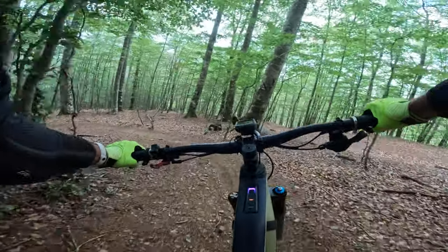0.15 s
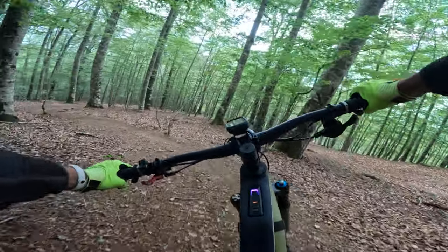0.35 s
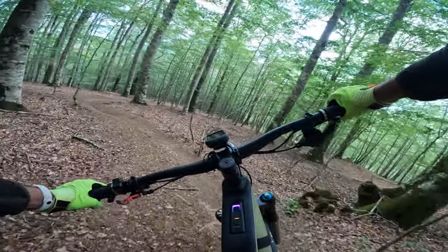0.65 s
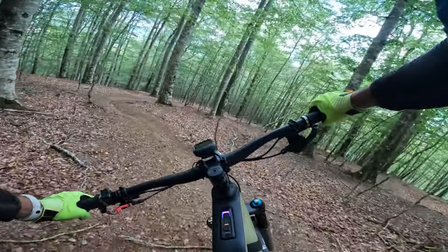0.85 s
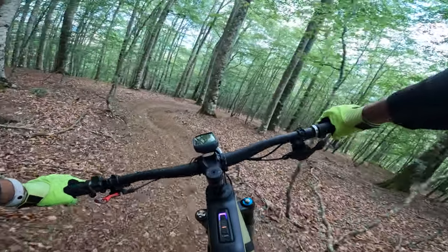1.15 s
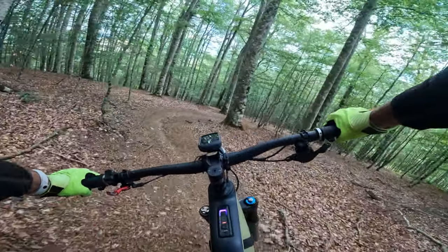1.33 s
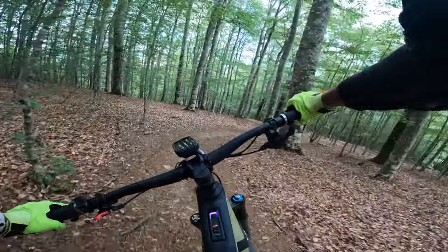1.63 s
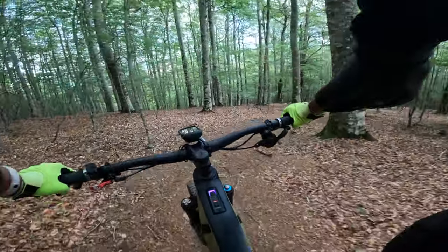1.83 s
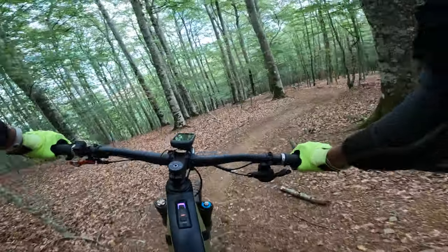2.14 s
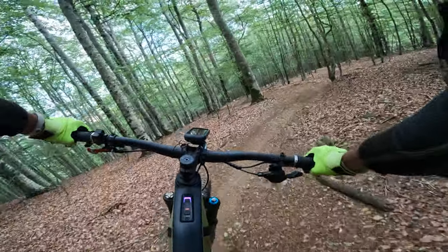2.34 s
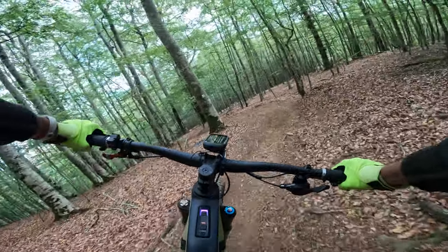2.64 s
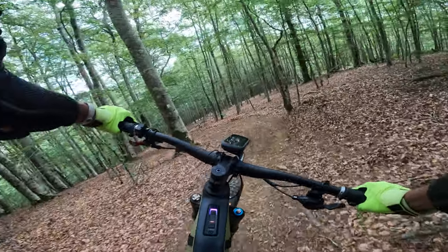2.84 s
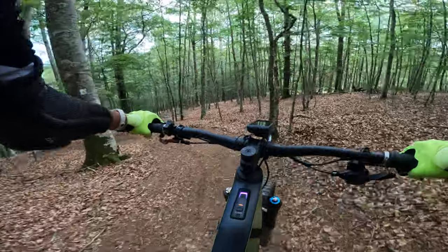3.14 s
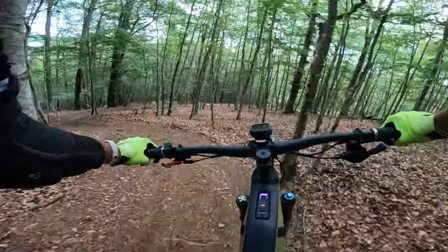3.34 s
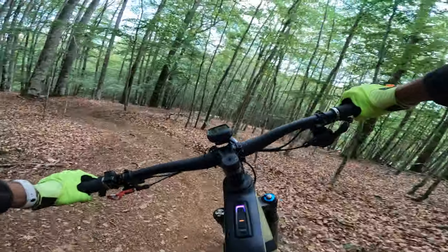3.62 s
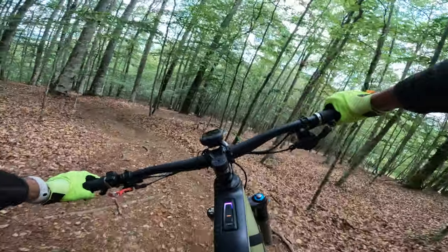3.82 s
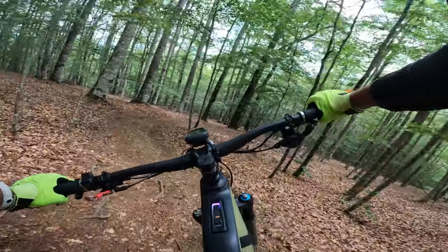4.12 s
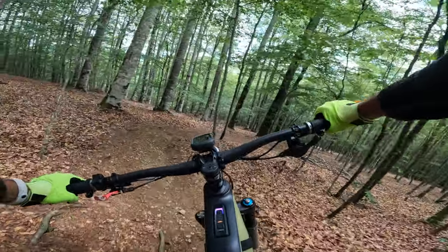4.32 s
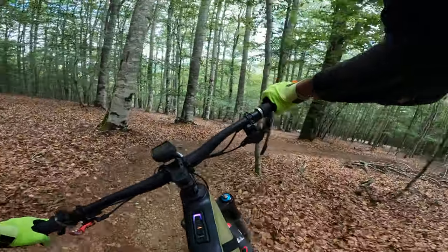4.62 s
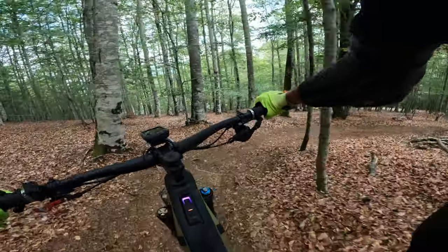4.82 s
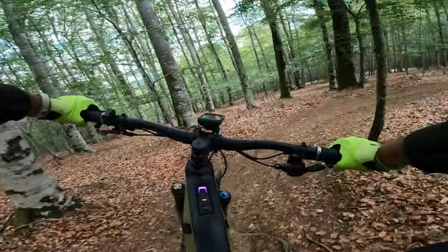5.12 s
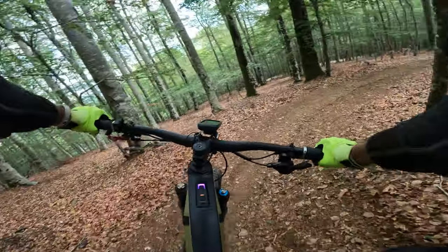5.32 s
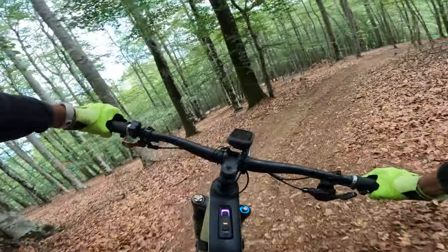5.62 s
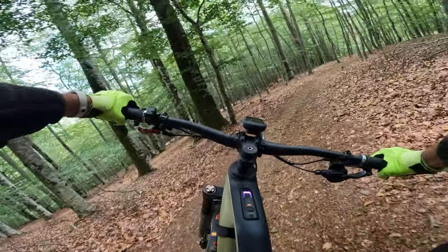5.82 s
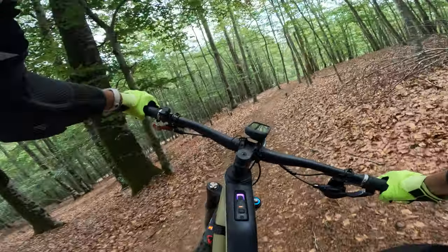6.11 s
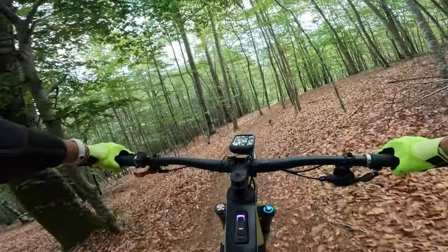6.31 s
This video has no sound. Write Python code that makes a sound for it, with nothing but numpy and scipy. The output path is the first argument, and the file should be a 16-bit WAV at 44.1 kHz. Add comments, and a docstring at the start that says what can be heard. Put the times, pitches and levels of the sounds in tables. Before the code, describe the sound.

A mountain bike descends a forest trail, heard close at the rider's chest with no noticeable echo. Gritty tyre scrub, dull drumming and dry leaf crackle run throughout beneath lumpy, low wind. From 0 to 0.8 s it is busy: twigs snap, the chain slaps brightly and heavy thuds cluster around 0.5-0.7. A knock lands at 1.0, then rolling smooths, with a thin ticking freewheel hiss. Jolts hit at 2.1-2.5 with tiny squeaks, and wind buffets strongly until 2.8. After a quieter stretch, a gust and deep bump arrive at 3.3-3.5, thuds at 3.6, then rapid hollow knocks and a rough skid around 3.95-4.15, the hardest knock at 4.06. It calms, the freewheel swelling near 4.7. Rattling slaps and short scrapes come at 5.07-5.2, more slaps at 5.4, strong thuds at 5.7, a knock at 6.07, and a final wind buffet at 6.4.

```python
"""Forest trail of dry leaves: a mountain bike rolls downhill, heard at the rider's chest.
Wind is shaped noise in gusts and buffets; leaves and twigs are gritty noise and short cracks.
The freewheel hisses with ratchet ticks; squeaks are rough sine sweeps.
Clicks and noise through resonances make the drumming frame, rattling parts and skids;
knocks, chain slaps and tyre thuds are short decaying tones with chatter."""
import sys
import numpy as np
from scipy import signal
from scipy.fft import rfft, irfft, next_fast_len
from scipy.io import wavfile
from scipy.ndimage import uniform_filter1d, minimum_filter1d

SR = 44100
rng = np.random.default_rng(int(sys.argv[2]) if len(sys.argv) > 2 else 0)


def put_to_file(sound):
    """Save the sound as 16-bit audio at rate SR, in the file named by the first command-line argument."""
    columns = np.atleast_2d(sound).T  # one column per channel
    safe = np.clip(columns, -1, 1)
    whole_steps = np.round(safe * 32767)
    wavfile.write(sys.argv[1], SR, whole_steps.astype(np.int16))


N = 284865

# steady rolling: t/s, drumming of tyres and frame/dB, tread scrub/dB
ROLLING = [(0.0, -25, -43), (0.52, -29, -36.5), (0.7, -28, -45), (1.01, -33.5, -38.5), (2.43, -29.5, -38),
           (2.9, -33.5, -43.5), (3.27, -32, -42), (3.51, -24.5, -34), (3.99, -30, -37.5),
           (4.44, -33.5, -42), (4.77, -33, -36.5), (5.07, -32, -37.5), (6.06, -35.5, -39.5),
           (6.46, -29.5, -56)]


def amp(db):
    """Decibels to gain."""
    return 10 ** (np.asarray(db) / 20)


def unit(x):
    """Scales to rms 1."""
    return x / np.sqrt(np.mean(x ** 2) + 1e-20)


def follow(table):
    """Each level column of a curve table as a gain per sample."""
    t, *columns = np.transpose(table)
    return [amp(np.interp(np.arange(N) / SR, t, db)) for db in columns]


def swells(table, rise_share):
    """Each level column of an event table as a gain per sample: swells that climb and fall away."""
    fall_db = 10  # climb and fall are timed over this change of level
    min_fall_s, min_rise_s = 0.01, 0.013
    t, power = np.arange(N) / SR, 0
    for peak_s, length_s, *db in table:
        fall = (t - peak_s) / max(length_s, min_fall_s)
        climb = (peak_s - t) / (min_rise_s + abs(rise_share * length_s))
        power = power + amp(2 * np.c_[db]) * amp(-2 * fall_db * np.maximum(fall, climb))
    return np.sqrt(power)


def colour(x, points):
    """Filters by a spectrum of (f/Hz, gain/dB), -90 dB outside its range."""
    f, db = np.transpose(points)
    size = next_fast_len(len(x) + 8192)
    hz = np.fft.rfftfreq(size, 1 / SR) + 1
    gain = amp(np.interp(np.log(hz), np.log(f), db, -90, -90))
    return irfft(rfft(x, size) * gain, size)[:len(x)]


def ring(x, hz, width_hz):
    """A two-pole resonance of gain about 1 at its centre."""
    r = np.exp(-np.pi * width_hz / SR)
    return 2 * signal.lfilter([1 - r], [1, -r * np.exp(2j * np.pi * hz / SR)], x).real


def body(x, modes):
    """Sum of resonances of alternating sign, each applied twice for steep skirts."""
    out = 0
    for k, (hz, width_hz, db) in enumerate(modes):
        out = out + (-1) ** k * amp(db) * ring(ring(x, hz, width_hz), hz, width_hz)
    return unit(out)


def smooth_noise(count, size):
    """Noise averaged twice over a window of size samples, at rms 1."""
    return unit(uniform_filter1d(uniform_filter1d(rng.standard_normal(count), size), size))


def flicker(window_s, depth_db):
    """Random gain that wanders on the given time scale."""
    return amp(depth_db * smooth_noise(N, max(int(window_s * SR), 2)))


def grit(per_s, spread_db, smooth):
    """Sparse clicks of very uneven size over a share of smooth noise."""
    size = amp(spread_db * np.minimum(rng.exponential(1, N), 3.5)) * rng.standard_normal(N)
    clicks = unit(size * (rng.random(N) < per_s / SR))
    return clicks + smooth * rng.standard_normal(N)


def pings(low_hz, high_hz, per_s, cycles, count):
    """Small hard pieces ring briefly: random clicks excite count pitches between two limits."""
    out = np.zeros(N)
    for hz in np.geomspace(low_hz, high_hz, count):
        width_hz = hz / cycles
        out += ring(ring(grit(per_s / count, 2.8, 0), hz, width_hz), hz, width_hz)
    return unit(out)


def add(mix, start_s, sound):
    """Mixes a sound in at a time."""
    part = mix[max(round(start_s * SR), 0):][:len(sound)]
    part += sound[:len(part)]


def blows(table, rise_s, rough, spread):
    """Each blow rings briefly at its own pitch and chatters over a wider band."""
    out, t = np.zeros(N), np.arange(5000) / SR
    for start_s, db, hz, cycles in table:
        onset = np.sin(np.pi / 2 * np.minimum(t / max(rise_s, .0003), 1)) ** 2
        envelope = onset * amp(-60 * t * hz / cycles)
        chatter = rng.standard_normal(len(t))
        for _ in range(3):
            chatter = ring(chatter, hz, hz * spread)
        tone = envelope * np.sin(2 * np.pi * hz * t)
        blow = (1 - rough) * tone + rough * envelope * unit(chatter)
        add(out, start_s, amp(db) * (1 - rough / 2) * unit(blow) * np.std(tone))
    return out


def wind():
    """Lumpy turbulence on the microphone port; short buffets flap at a higher pitch than long ones."""
    # airflow: t/s, level/dB
    airflow = [(0.0, -24.5), (0.79, -38.5), (2.05, -25), (3.26, -29.5), (3.44, -19), (3.97, -36),
               (4.41, -35), (5.25, -32), (6.13, -26), (6.46, -22)]
    # buffets of air: peak t/s, length/s, level/dB
    buffets = [(0.23, 0.75, -20), (0.63, 0.05, -34), (0.75, 0.042, -43), (0.883, 0.24, -25.5),
               (1.043, 0.14, -27), (1.213, 0.04, -20), (1.399, 0.016, -15), (1.617, 0.15, -19),
               (2.008, 0.13, -17), (2.103, 0.17, -23), (2.31, 0.065, -17.5), (2.43, 0.026, -29),
               (2.53, 0.032, -13), (2.696, 0.078, -14.5), (2.77, 0.065, -11.5), (3.084, 0.034, -28),
               (3.317, 0.092, -12.5), (3.534, 0.11, -18), (3.82, 0.2, -27), (3.994, 0.22, -21.5),
               (4.166, 0.11, -32.5), (5.064, 0.072, -13.5), (5.163, 0.045, -15), (5.425, 0.09, -15),
               (5.715, 0.081, -21.5), (6.21, 0.059, -30), (6.401, 0.059, -11)]
    # rumble spectrum: f/Hz, relative level/dB
    gust_spectrum = [(5, -22.5), (12, 4), (35, -1.5), (60, -6), (100, -12.5), (150, -16.5), (250, -55),
                     (500, -76)]
    # flap spectrum: f/Hz, relative level/dB
    flap_spectrum = [(15, -32), (40, 1), (70, -7), (110, -10.5), (170, -10.5), (300, -30)]
    quick_s = 0.061  # buffets much shorter than this mostly flap
    air = rng.standard_normal(N) * flicker(0.15, 3.3)
    shared = []
    for peak_s, length_s, db in buffets:
        quick = np.exp(-length_s / quick_s)  # power share of the flap
        shared.append((peak_s, length_s, db + 10 * np.log10(1 - quick), db + 10 * np.log10(quick)))
    rumble, flap = swells(shared, rise_share=0.35)
    low = np.hypot(follow(airflow)[0], rumble) * unit(colour(air, gust_spectrum))
    return low + amp(-4.0) * flap * unit(colour(rng.standard_normal(N), flap_spectrum))


def freewheel():
    """Uneven ratchet ticks blur into a thin hiss that rings the hub."""
    # freewheel level: t/s, level/dB
    buzz_level = [(0.0, -85), (0.84, -63), (1.17, -57), (1.98, -59), (2.9, -61.5), (3.36, -62.5),
                  (3.4, -80), (3.81, -65), (4.08, -73), (4.2, -61.5), (4.55, -60.5), (4.73, -54),
                  (5.23, -63), (5.6, -60), (5.68, -72), (5.71, -62), (6.24, -55.5), (6.28, -64),
                  (6.46, -66)]
    # hiss spectrum: f/Hz, relative level/dB
    hiss_spectrum = [(9500, -39), (11000, -10), (12000, -7), (12600, 2.5), (13600, -9), (14200, -8),
                     (15700, -15)]
    # hub rings: f/Hz, width/Hz, relative level/dB
    hub_modes = [(4060, 180, -27), (6280, 770, 16), (7640, 4360, 7)]
    ticks_per_s = 75
    turns = np.cumsum(ticks_per_s * flicker(0.043, 0.19)) / SR
    tick_shape = 1.5 + np.exp(-(turns % 1) / .3)
    ticks = tick_shape * flicker(0.017, 0.98) * rng.standard_normal(N)
    hiss = unit(colour(ticks, hiss_spectrum))
    return follow(buzz_level)[0] * (amp(-5.0) * hiss + amp(1.5) * body(ticks, hub_modes))


def squeaks():
    """Brief, rough rubbing whistles with a weak octave."""
    # squeaks: t/s, length/s, level/dB, mean start f/Hz, mean end f/Hz
    squeak_events = [(2.228, 0.035, -38, 2520, 2400), (2.265, 0.034, -35, 2016, 2350),
                     (2.438, 0.037, -32.5, 2130, 2470), (3.145, 0.044, -38.5, 2260, 2110),
                     (6.159, 0.033, -46, 3910, 3940)]
    out = np.zeros(N)
    for start_s, length_s, db, start_hz, end_hz in squeak_events:
        size = int(length_s * SR)
        wobble, waver = smooth_noise(size, 30), smooth_noise(size, 30)
        hz = np.linspace(start_hz, end_hz, size) * (1 + .06 * wobble)
        phase = 2 * np.pi * np.cumsum(hz) / SR
        tone = np.sin(phase) + 0.15 * np.sin(2 * phase)
        add(out, start_s, amp(db) * np.hanning(size) ** .3 * (1 + 0.5 * waver) * tone)
    return out


def snaps():
    """Twigs and leaf clumps crushed: short clusters of cracks in high, middle and low bands."""
    # snaps: t/s, high part/dB, middle part re high/dB, low part re high/dB
    snap_events = [(0.096, -28, 1, 9.5), (0.167, -29, -1, -4), (0.226, -27, -2, -9), (0.34, -26, -7, -13),
                   (0.424, -40.5, 2, 18), (0.438, -24, -3, -2), (0.445, -39, 4, -5), (0.467, -32, 8, 9),
                   (0.506, -21, -8, 0), (0.534, -37, 4, 6), (0.543, -23.5, 1, 2), (0.576, -22, 0, -9),
                   (0.583, -32, 2, -8), (0.6, -30, 4, 11.5), (0.641, -32, -13, 0), (0.6958, -29.5, 6, -1),
                   (0.774, -32, -9, -2), (0.789, -21, -7, -6.5), (0.92, -24, -13, -1), (1.043, -30, -9, -4),
                   (1.208, -26.5, -2, 0.5), (1.223, -26, -7, 5), (1.268, -35.5, 2, -8),
                   (2.196, -43, 13, 23), (2.512, -34, -2, -4), (2.566, -50, -2, 29),
                   (2.593, -23.5, 0, 12.5), (3.335, -37, -1, 18), (3.368, -36, 5, 19.5), (3.65, -31, 1, 12),
                   (3.7885, -24.5, -7, 4), (4.372, -32, -10.5, 4), (4.6894, -42.5, 12, 5),
                   (4.7303, -26.5, -10, 3.5), (5.347, -42.5, -8, 21.5), (5.358, -43, 11, 11),
                   (5.372, -40.5, 5, 16), (5.406, -34, 5, 9), (5.416, -35, 8, 5), (5.43, -36, 4, 8),
                   (5.442, -47, 4, 11), (5.4895, -33, -2, -5), (5.791, -32.5, -1, 11),
                   (5.895, -29.5, -3, 5), (6.128, -32, -2, 2), (6.356, -33, -2, -3)]
    # spectra of the high, middle and low parts, each: f/Hz, gain/dB
    crack_spectra = [
        [(3500, -33), (5500, -14), (7000, -2.5), (8500, -10), (10000, -27), (12500, -26)],
        [(2000, -26), (3000, 0.5), (5000, 1), (7000, -7)],
        [(900, 7), (1500, -1.5), (2800, -2), (4000, -5)],
    ]
    rise_s, hold_s, t60_s = 0.0046, 0.0046, 0.043
    parts, t = np.zeros((3, N)), np.arange(4000) / SR
    envelope = np.minimum(t / rise_s, 1) * amp(-60 * np.maximum(t - hold_s, 0) / t60_s)
    for start_s, db, mid_db, low_db in snap_events:
        cracks = amp(4.6 * np.repeat(rng.standard_normal(100), 40))  # level steps every 40 samples
        for part, part_db in zip(parts, (db, db + mid_db, db + low_db)):
            add(part, start_s, amp(part_db) * envelope * cracks * rng.standard_normal(len(t)))
    return amp(-2.0) * sum(colour(part, points) for part, points in zip(parts, crack_spectra))


def leaves():
    """Tread scrubs the ground, flings grit and crushes leaves into fine crackle; the wheel whirrs."""
    # heaps of leaves run over: peak t/s, length/s, scrub/dB, crackle/dB
    heaps = [(0.12, 0.51, -31, -41.5), (0.47, 0.13, -29, -39), (0.56, 0.21, -33, -40.5),
             (0.7, 0.025, -27, -35), (0.79, 0.076, -40, -43), (0.92, 0.029, -30.5, -37),
             (1.22, 0.014, -39, -36), (1.94, 0.079, -30.5, -41.5), (2.1, 0.0093, -30, -54),
             (2.19, 0.15, -33, -52), (2.46, 0.027, -51, -46), (2.52, 0.04, -34, -41.5),
             (2.61, 0.013, -28, -38), (2.7, 0.12, -38.5, -44.5), (3.18, 0.043, -39, -53),
             (3.35, 0.13, -31.5, -46), (3.67, 0.061, -32.5, -42), (3.8, 0.061, -41, -38),
             (4.08, 0.12, -47, -67), (4.72, 0.24, -48, -41.5), (5.07, 0.11, -34, -58),
             (5.18, 0.056, -40, -48), (5.36, 0.025, -32, -51), (5.42, 0.086, -30, -42),
             (5.72, 0.023, -32, -40), (5.81, 0.046, -33.5, -43), (5.92, 0.018, -46, -42),
             (6.17, 0.38, -38, -51), (6.42, 0.16, -35.5, -45.5)]
    # scrub spectrum: f/Hz, relative level/dB
    scrub_spectrum = [(1000, 5.5), (1450, -6.5), (1700, 2.5), (2000, 2), (2350, 1.5), (2550, 3.5),
                      (2800, -4), (3300, -5.5), (4500, -18)]
    # crackle spectrum: f/Hz, relative level/dB
    leaf_spectrum = [(2000, -11), (3200, 0), (4800, 1.5), (5800, -3.5), (6700, -5.5), (8000, -8),
                     (9500, -14.5), (11000, -19.5), (12500, -28)]
    # faint whirring bands of the rolling wheel: f/Hz, width/Hz, relative level/dB
    whirr_modes = [(2570, 540, -3), (3975, 170, -6), (6600, 460, -16.5)]
    crackle_db = -9.5  # steady crackle re steady scrub
    rolling = follow(ROLLING)[1]
    scrub, crackle = np.hypot(swells(heaps, rise_share=0.29), rolling * amp([[0], [crackle_db]]))
    clumps = flicker(.009, 1.7)  # leaves lie in heaps
    tread = unit(colour(grit(4000, 4.5, 1.2) * clumps, scrub_spectrum))
    crush = unit(colour(grit(5600, 1.0, 2.5) * clumps * flicker(0.0078, 0.215), leaf_spectrum))
    flung = amp(-14.0) * scrub * pings(1190, 2874, 390, 8.1, count=10)
    flung += amp(-8.5) * crackle * pings(3380, 8700, 400, 3.9, count=10)
    flung = colour(flung, [(500, -28), (900, 1.5), (9000, -8), (12000, -40)])
    whirr = amp(-15.5) * rolling * body(rng.standard_normal(N) * flicker(0.018, 6.1), whirr_modes)
    return whirr + amp(-5.0) * scrub * tread + amp(-4.0) * crackle * crush + flung


def slaps():
    """Chain slaps: bright, short rings with chatter."""
    # slaps: t/s, level/dB, f/Hz, cycles rung per 60 dB decay
    slap_events = [(0.0295, -20, 2010, 60), (0.0942, -19, 1740, 60), (0.4202, -22, 2240, 60),
                   (0.4675, -18, 2530, 60), (0.5115, -26, 1780, 50), (0.5455, -9.5, 2630, 45),
                   (0.546, -13, 4900, 70), (0.6, -19, 3390, 60), (0.6603, -10.5, 1800, 33),
                   (0.6955, -19, 1660, 47), (1.949, -17, 2110, 57), (2.0707, -25, 1800, 48),
                   (2.0986, -14.5, 1900, 22), (2.176, -20, 1580, 60), (2.4995, -21, 2400, 40),
                   (2.51, -21, 1900, 50), (2.596, -30, 2650, 60), (3.0664, -24, 2200, 42),
                   (3.2984, -21, 2180, 50), (3.3377, -18, 2030, 50), (3.338, -20, 3140, 50),
                   (3.455, -18, 1720, 50), (4.2354, -18, 1480, 30), (4.652, -24.5, 1680, 40),
                   (4.803, -28, 1680, 40), (4.838, -28, 2050, 50), (5.04, -29, 1450, 30),
                   (5.0643, -15.5, 1490, 42), (5.0655, -21, 2480, 25), (5.066, -9.5, 2920, 30),
                   (5.137, -24, 2290, 40), (5.198, -22, 1600, 40), (5.1716, -24, 1940, 40),
                   (5.293, -24, 2000, 32), (5.349, -16, 1660, 50), (5.36, -17, 2360, 53),
                   (5.378, -22, 2580, 50), (5.4155, -9, 2130, 52), (5.429, -20, 2330, 60),
                   (5.459, -17, 2150, 45), (5.7048, -15, 1680, 67), (5.8127, -21, 1540, 50),
                   (5.911, -18, 1640, 48), (6.0695, -16, 1520, 25), (6.128, -23, 1540, 50),
                   (6.162, -23, 2030, 28), (6.2068, -22.5, 1750, 60)]
    return blows(slap_events, rise_s=0.0019, rough=0.32, spread=0.71)


def knocks():
    """Stones and cables knock on the frame, which rings briefly."""
    # knocks: t/s, level/dB, f/Hz, cycles rung per 60 dB decay
    knock_events = [(0.07, -16, 683, 41), (0.152, -30, 626, 28), (0.191, -16.5, 694, 38),
                    (0.414, -14.5, 784, 42), (0.469, -17, 766, 35), (0.491, -12.5, 810, 31),
                    (0.514, -20, 640, 32), (0.666, -13, 770, 40), (0.675, -17.5, 712, 77),
                    (0.888, -19, 670, 42), (1.013, -6, 1125, 12.5), (1.47, -23, 800, 18),
                    (1.739, -14, 1000, 14), (1.941, -15.5, 547, 31), (2.067, -20.5, 860, 52),
                    (2.087, -15, 1090, 50), (2.098, -7, 865, 23), (2.108, -20, 1050, 40),
                    (2.171, -14, 695, 41), (2.499, -6, 760, 29), (2.508, -14, 880, 30),
                    (2.595, -15, 552, 37), (3.338, -16, 920, 28), (3.361, -19, 1110, 30),
                    (3.452, -4.5, 764, 17), (3.459, -8.5, 650, 22), (3.576, -14, 765, 20),
                    (3.588, -13, 790, 32), (3.625, -13.5, 816, 53), (3.633, -14, 694, 19),
                    (3.767, -17, 706, 32), (3.829, -13, 820, 29), (3.912, -17, 700, 24),
                    (3.934, -12, 850, 45), (3.943, -8, 800, 35), (4.0, -13, 870, 43), (4.029, -13, 824, 30),
                    (4.048, -12, 745, 30), (4.059, 2, 870, 32), (4.079, -7, 800, 27),
                    (4.104, -11.5, 973, 32), (4.236, -13, 756, 18), (4.652, -21, 800, 28),
                    (5.067, -7.5, 700, 17), (5.106, -17, 910, 27), (5.134, -20, 960, 22),
                    (5.173, -19, 860, 42), (5.196, -17, 810, 28), (5.274, -16, 860, 14),
                    (5.414, -17, 920, 27), (5.702, -10.5, 850, 47), (5.711, -6.5, 855, 42),
                    (6.0695, -6, 1050, 13.5), (6.085, -18, 650, 32), (6.252, -14, 617, 15),
                    (6.287, -22, 790, 25)]
    return blows(knock_events, rise_s=0.0018, rough=0.34, spread=0.9)


def thuds():
    """The tyre bottoms on a root: low, quickly damped blows."""
    # thuds: t/s, level/dB, f/Hz
    thud_events = [(0.501, 3, 307), (0.539, -2.5, 392), (0.571, -3, 310), (0.717, -7, 370),
                   (2.099, -4, 447), (2.181, -5, 300), (2.307, -5.5, 316), (2.502, -12, 395),
                   (3.459, -2.5, 193), (3.609, -3.5, 372), (3.643, -3, 363), (5.067, -10, 332),
                   (5.171, -6, 112), (5.456, -6.5, 310), (5.483, -7, 212), (5.38, -6, 337),
                   (5.704, -1, 463), (5.711, 0.5, 264), (5.738, -4.5, 254)]
    cycles = 6.5  # rung per 60 dB decay
    return blows([row + (cycles,) for row in thud_events], rise_s=0.0016, rough=0.31, spread=0.9)


def skid():
    """Rapid, fluttering slips over roots excite the tyre wall and frame and scrape the ground."""
    # skids: t/s, length before fade-out/s, level/dB, share of bright scrape (0-1)
    skid_events = [(3.968, 0.14, -19.5, 0.43), (4.12, 0.023, -39, 0.2), (5.091, 0.045, -25, 0.57),
                   (5.156, 0.052, -27, 0.46)]
    # tyre wall and frame: f/Hz, width/Hz, relative level/dB
    rasp_modes = [(804, 400, 7.5), (1110, 340, -1), (1320, 440, 1), (1800, 220, -4), (2340, 510, -30)]
    # scrape spectrum: f/Hz, relative level/dB
    scrape_spectrum = [(300, 3), (550, 11.5), (1000, -4), (1800, 1), (2700, -15), (3500, -23)]
    fade_in_s, fade_out_s = 0.016, 0.045
    t, out = np.arange(N) / SR, np.zeros(N)
    slips = grit(1800, 4.0, 0.85) * flicker(0.0049, 2.1)
    rasp, scrape = body(slips, rasp_modes), unit(colour(slips, scrape_spectrum))
    for start_s, length_s, db, bright in skid_events:
        fade_in, fade_out = (t - start_s) / fade_in_s, 1 + (start_s + length_s - t) / fade_out_s
        envelope = np.clip(np.minimum(fade_in, fade_out), 0, 1) ** 2
        out += amp(db) * envelope * ((1 - bright) * rasp + bright * scrape)
    return out


def frame():
    """Bumps drum on tyres and frame and shake the loose parts."""
    # roots and ruts: peak t/s, length/s, drumming/dB, rattle/dB
    bump_events = [(0.0, 0.016, -13, -18), (0.16, 0.011, -19, -48), (0.23, 0.043, -17, -32),
                   (0.34, 0.22, -23, -44), (0.5, 0.14, -26, -28.5), (0.95, 0.088, -27, -38),
                   (1.2, 0.025, -23.5, -29.5), (1.37, 0.14, -28.5, -35), (1.55, 0.076, -26, -36),
                   (1.96, 0.015, -24.5, -34), (2.19, 0.025, -13.5, -30), (2.33, 0.0081, -17.5, -28),
                   (2.39, 0.024, -19.5, -37), (2.52, 0.08, -22.5, -39), (2.61, 0.0093, -25, -41),
                   (2.7, 0.046, -27, -38), (3.07, 0.016, -25, -37), (3.33, 0.18, -26.5, -41),
                   (3.5, 0.26, -25.5, -47), (3.65, 0.012, -20, -35), (3.81, 0.055, -24.5, -27),
                   (3.99, 0.27, -22, -30.5), (4.17, 0.089, -32, -54), (4.48, 0.029, -26, -37),
                   (4.59, 0.076, -28, -55), (5.07, 0.14, -23, -30.5), (5.38, 0.039, -34, -33.5),
                   (5.47, 0.059, -29.5, -54), (5.58, 0.012, -22, -35.5), (5.72, 0.077, -22, -28.5),
                   (6.17, 0.01, -22, -47), (6.28, 0.014, -23, -48), (6.41, 0.043, -25.5, -52)]
    # tyres and frame: f/Hz, width/Hz, relative level/dB
    drum_modes = [(169, 83, 3.5), (205.5, 49, 9), (268, 88, 0.5), (344.6, 79.6, 9), (377.2, 227, 2)]
    # rattling parts: f/Hz, width/Hz, relative level/dB
    part_modes = [(637, 188, 8), (821, 334, 5), (986, 656, -1), (1400, 530, -21), (1500, 500, -5)]
    rattle_db = -9  # steady rattle re steady drumming
    steady = follow(ROLLING)[0] * amp([[0], [rattle_db]])
    drum, rattle = np.hypot(swells(bump_events, rise_share=0.25), steady)
    bumps = flicker(0.051, 1.27)  # one uneven ground drives both
    low = body(grit(700, 1.1, 0.78) * bumps, drum_modes)
    high = body(grit(1500, 0.28, 0.76) * bumps * flicker(0.018, 1.0), part_modes)
    taps = pings(518, 1303, 260, 6.3, count=9) * bumps  # cables and small stones
    return drum * low + rattle * (high + amp(-7) * taps)


def scene():
    """All sources meet at one microphone."""
    solid_hz = 6030  # blows through rubber and frame carry little above this
    solid = slaps() + knocks() + thuds() + skid() + frame()
    solid = signal.sosfilt(signal.butter(4, solid_hz, fs=SR, output="sos"), solid)
    return (wind() + freewheel() + squeaks() + snaps() + leaves() + solid)[None]


def record(dry):
    """A limiter turns the gain down smoothly around the largest swings; then the band limit."""
    limit, edge_hz = 0.52, 15750  # limiter ceiling (full scale = 1), low-pass edge
    gain = minimum_filter1d(limit / np.maximum(abs(dry), limit), size=441)
    held = dry * uniform_filter1d(uniform_filter1d(gain, size=220), size=220)
    edge = signal.firwin(1023, edge_hz, window=("kaiser", 10), fs=SR)
    padded = np.pad(held, ((0, 0), (511, 511)), "reflect", reflect_type="odd")
    return signal.oaconvolve(padded, edge[None], "valid")


dry = scene()
out = record(dry)
put_to_file(out)
```